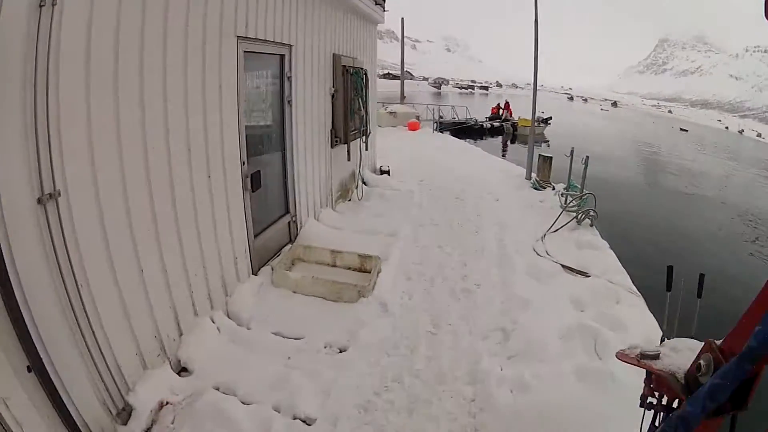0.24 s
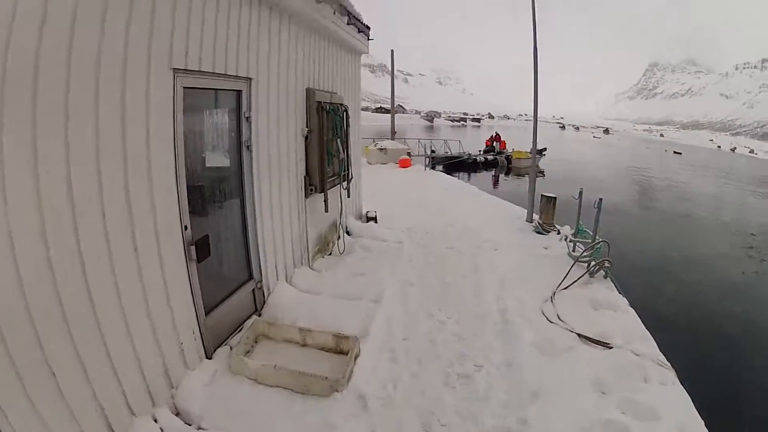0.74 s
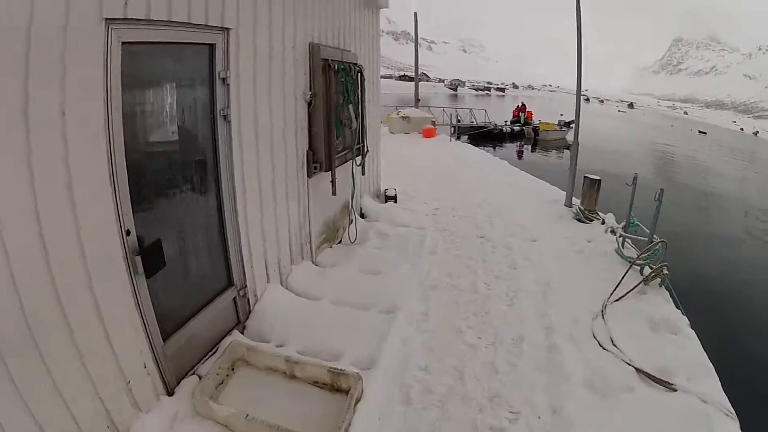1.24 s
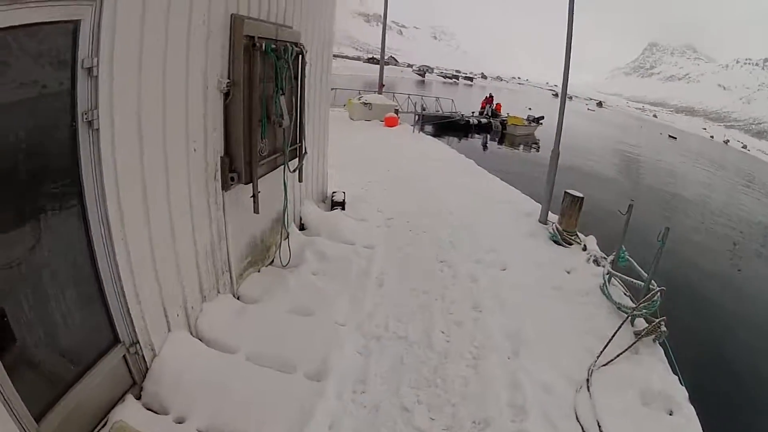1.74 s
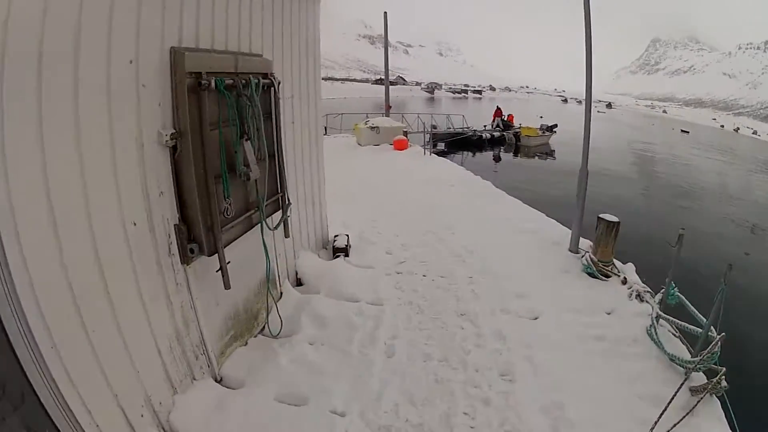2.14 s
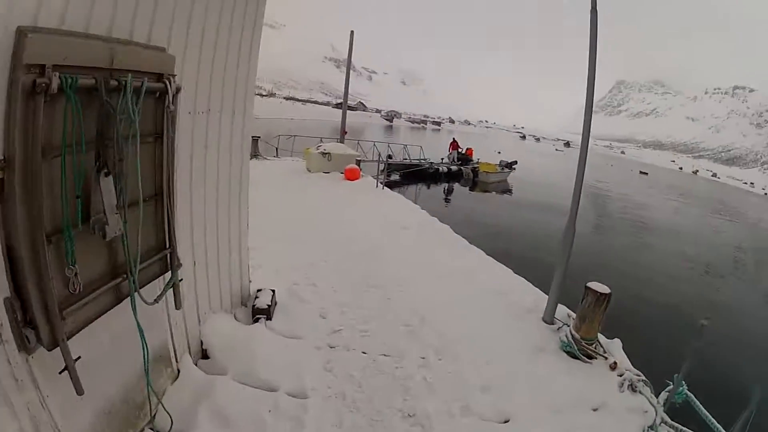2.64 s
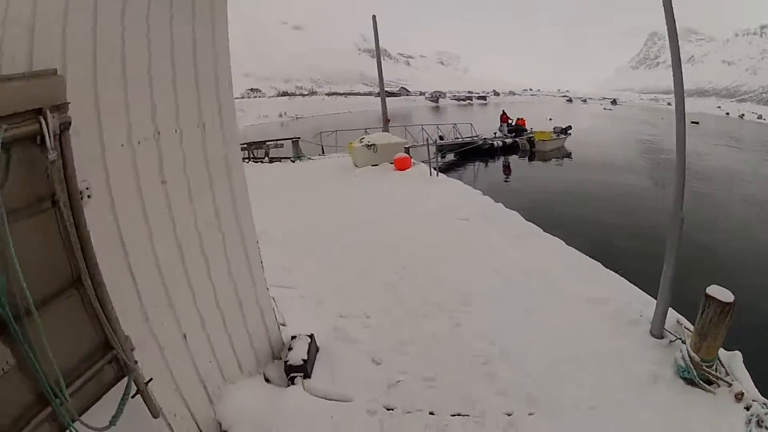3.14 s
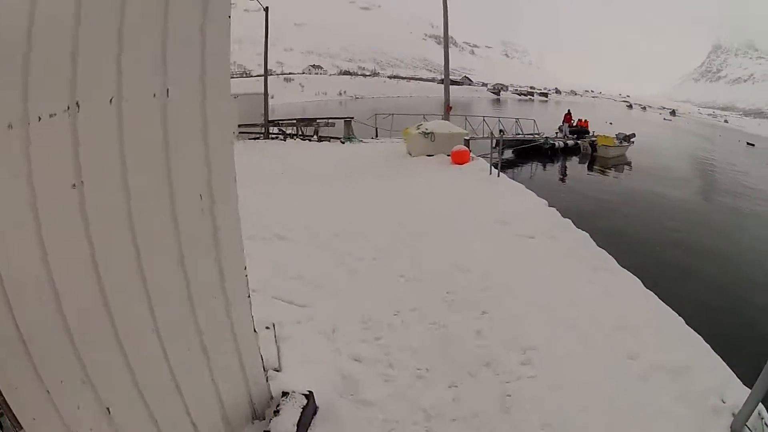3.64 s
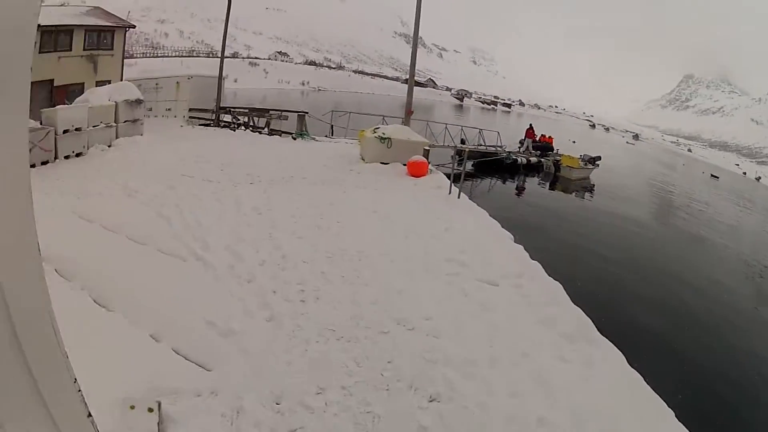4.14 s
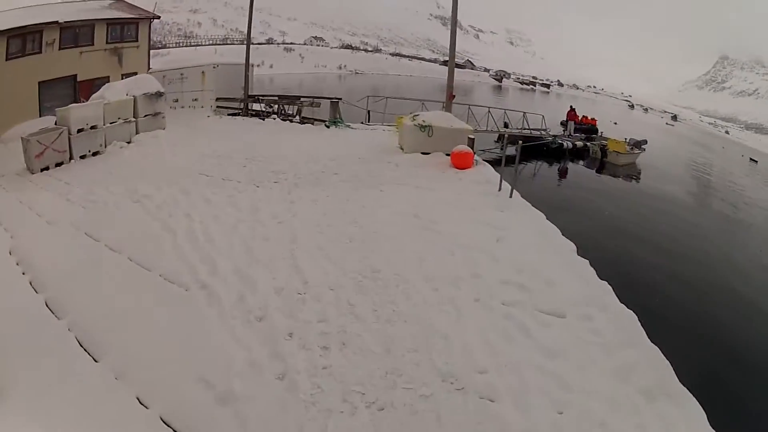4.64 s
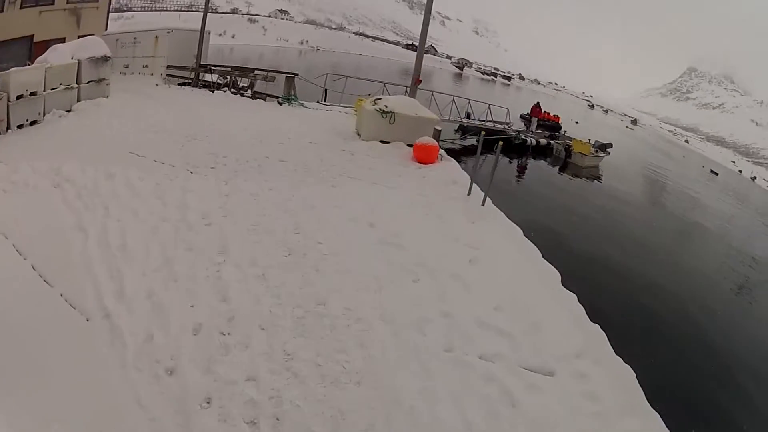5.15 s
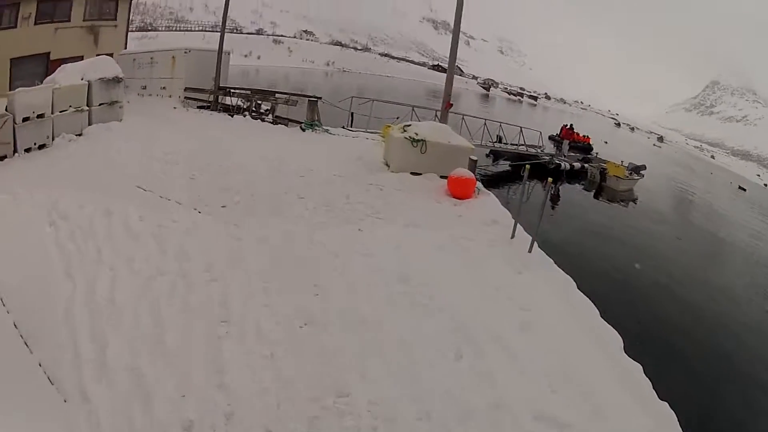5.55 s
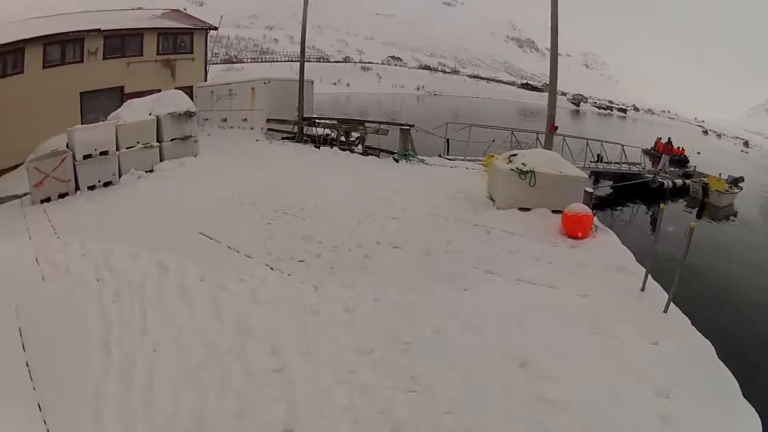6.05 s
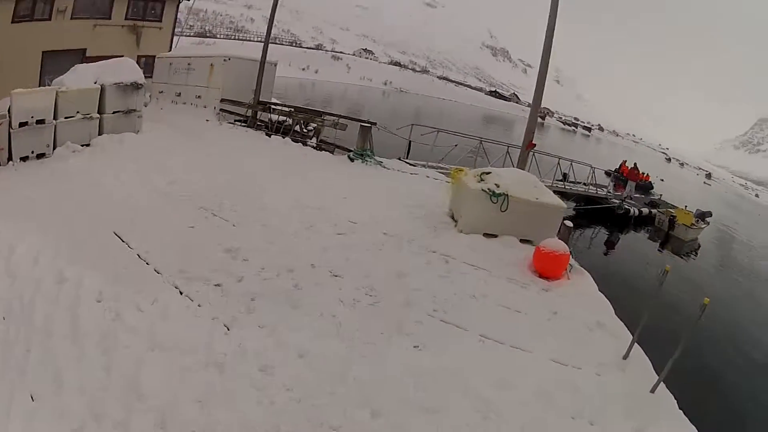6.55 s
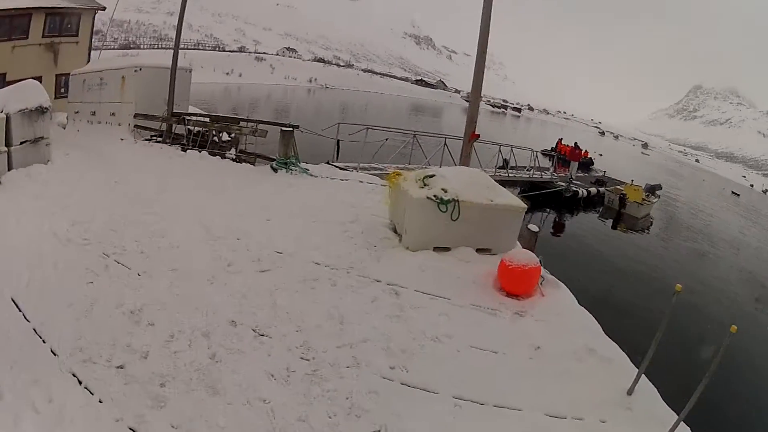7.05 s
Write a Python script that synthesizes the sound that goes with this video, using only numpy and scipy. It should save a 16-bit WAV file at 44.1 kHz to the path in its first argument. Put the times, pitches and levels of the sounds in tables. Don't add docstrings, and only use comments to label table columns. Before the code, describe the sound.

Heard from inside a small sealed plastic case worn on the body, a person walks across packed snow on a quay. Low cloth rumble and soft thumps swell with each stride, snow crunches in short boxy bursts, and straps and a catch knock and tick irregularly on the shell. The sharpest click comes just after three seconds. Faint harbour hum, hiss and thin electronic whine lie underneath.

```python
import sys
import numpy as np
from scipy import signal
from scipy.fft import rfft, irfft, next_fast_len
from scipy.io import wavfile
from scipy.ndimage import uniform_filter1d

SR = 44100
rng = np.random.default_rng(int(sys.argv[2]) if len(sys.argv) > 2 else 0)


def materialize(psi):
    bounded = np.clip(np.atleast_2d(psi).T, -1, 1)
    quanta = np.round(bounded * 32767).astype(np.int16)
    wavfile.write(sys.argv[1], SR, quanta)


def convert_level_to_amplitude(level_db):
    exponent = np.asarray(level_db, float) / 20
    return 10 ** exponent


N = 321048


def level(x, rms_db):
    return x * convert_level_to_amplitude(rms_db) / np.sqrt(np.mean(x ** 2))


def ring(x, hz, width_hz):
    return signal.lfilter(*signal.iirpeak(hz, hz / width_hz, fs=SR), x)


def band(x, low_hz, high_hz):
    return signal.sosfilt(signal.butter(3, [low_hz, high_hz], "bandpass", fs=SR, output="sos"), x)


def coloured_noise(spectrum):
    hz, db = np.transpose(spectrum)
    size = next_fast_len(N)
    log_hz = np.log(np.arange(1, size // 2 + 2) * SR / size)
    gain = convert_level_to_amplitude(np.interp(log_hz, np.log(hz), db))
    return irfft(rfft(rng.standard_normal(N), size) * gain, size)[:N]


def walk(rate_hz):
    hold = int(SR / rate_hz)
    draws = rng.standard_normal(N // 100 + 1)[:N // hold + 1]
    steps = np.repeat(draws, hold)
    return 1.3 * uniform_filter1d(uniform_filter1d(steps, hold), hold)[:N]


def swells(s, peak_db, rise_ms, fall_ms, rest_db):
    t = np.arange(0, N / SR, 1 / 500)
    since_ms = (t[:, None] - s) * 1e3
    drop_db = 10 * np.where(since_ms < 0, -since_ms / rise_ms, since_ms / fall_ms)
    power = (convert_level_to_amplitude(peak_db - drop_db) ** 2).sum(axis=1) + convert_level_to_amplitude(rest_db) ** 2
    return np.interp(np.arange(N) / SR, t, 10 * np.log10(power))


# (frequency [Hz], width [Hz], level [dB])
PANELS = [
    (722, 110, -13.5),
    (956, 88, -2.5),
    (1130, 144, -7),
    (2120, 65, 0.5),
    (2233, 83, -4),
    (3443, 380, 2.5),
    (4250, 550, 5.5),
    (5480, 720, 6),
]


def shell(x, flat_db, patchy_db):
    out = convert_level_to_amplitude(flat_db) * x
    for k, (hz, width_hz, db) in enumerate(PANELS):
        other_grains = np.roll(x, 9973 * k)
        out = out + convert_level_to_amplitude(db + patchy_db * walk(70)) * ring(other_grains, hz, width_hz)
    return out


def blows(table, low_hz, high_hz, wobble_rad, rise_ms, leak, trim_db):
    size = 2048
    out, t_ms = np.zeros(N + size), np.arange(size) / SR * 1e3
    for s, db, hz, ms, noisy in table:
        grit = rng.standard_normal(size)
        shape = (1 - np.exp(-t_ms / rise_ms)) * np.exp(-1.5 * t_ms / ms - (t_ms / ms) ** 4 / 4)
        phase = 2 * np.pi * hz * t_ms / 1e3 + wobble_rad * np.cumsum(grit[::-1])
        tone = shape * np.sin(phase)
        rattle = shape * grit * leak
        for panel_hz, width_hz, _ in PANELS:
            rattle = rattle + ring(shape * grit, panel_hz, 2 * width_hz)
        rattle = band(rattle, low_hz, high_hz)
        noisy = np.clip(noisy, 0, 1)
        blow = (1 - noisy) * tone / abs(tone).max() + noisy * rattle / abs(rattle).max()
        start = int(s * SR)
        out[start:start + size] += convert_level_to_amplitude(db + trim_db) * blow / abs(blow).max()
    return out[:N]


# (frequency [Hz], level [dB per Hz])
HARBOUR_SPECTRUM = [(29, -32), (50, -2.5), (91, -8.5), (306, -16), (566, -21), (810, -26), (949, -25.5),
                    (1410, -31), (1900, -29), (2100, -25), (2670, -35), (4140, -35), (5800, -43),
                    (7540, -74), (12800, -120)]


def harbour():
    return level(coloured_noise(HARBOUR_SPECTRUM), -63.5)


# (frequency [Hz], level [dB per Hz])
CIRCUIT_SPECTRUM = [(35, -40), (60, -12), (113, 4), (193, 4), (907, -17), (2230, -16.5), (4790, -15),
                    (5800, -12), (7540, -47), (12800, -120)]


def circuit_hiss():
    hiss = level(coloured_noise(CIRCUIT_SPECTRUM), -75.3)
    return hiss * np.array([[1], [-1]])


# (time [s], frequency [Hz])
LOAD_PITCH = [(.3, 4300), (1.0, 4230), (1.25, 4044), (1.7, 4000), (2.1, 4100), (2.5, 4240), (2.65, 4060),
              (2.9, 4220), (3.05, 4260), (3.25, 4025), (3.9, 4010), (4.3, 4130), (4.9, 4227), (5.4, 3977),
              (5.9, 4110), (6.5, 4203), (7.05, 4230), (7.25, 4010)]


def whine():
    whine_db, half_pitch_db, light_db, light_hz, sag_hz = -75.2, -1.5, -4.5, 4600, 259.2
    t = np.arange(N) / SR
    frames = (t + .0225) * 29.97
    which, part = frames.astype(int), frames % 1
    pitch, bend, size = rng.standard_normal((which[-1] + 1, 3))[which].T
    is_light = which % 3 == 2
    heavy_hz = np.interp(t, *np.transpose(LOAD_PITCH)) + 70 * pitch + 190 * bend * (part - .4)
    heavy_hz = heavy_hz + 90 - 250 * np.exp(-part / .06) - sag_hz * (part / .8) ** 2
    to_light = is_light * np.clip((part - .12) / .15, 0, 1)
    hz = heavy_hz + to_light * (light_hz + 50 * pitch - heavy_hz) + 90 * walk(200)
    gate = np.clip(5 * np.sin(np.pi * np.clip(part / .86, 0, 1)), .12, 1)
    gate = gate * convert_level_to_amplitude(2.5 * np.clip(size, -3, 1) + light_db * is_light)
    half_phase = np.pi * np.cumsum(hz) / SR
    full = level(gate * np.sin(2 * half_phase), whine_db)
    return full + level(gate * np.sin(half_phase), whine_db + half_pitch_db)


# (time [s], body level [dB], hollow level [dB], time per 10 dB [ms])
CLOTH_RUBS = [(.005, -57, -55, 47), (.24, -49, -50, 121), (.77, -56, -61, 140), (1.43, -55, -63.5, 220),
              (1.95, -54.5, -61.5, 100), (2.21, -63, -76, 110), (2.4, -51.5, -59.5, 98),
              (2.55, -58.5, -59, 72), (3.155, -47.5, -52.5, 48), (3.55, -75, -66, 60),
              (3.66, -56.5, -67, 100), (3.9, -60, -62, 105), (4.25, -54, -55.5, 73), (4.34, -64, -57, 60),
              (4.45, -61, -58.5, 80), (4.6, -67, -63.5, 150), (4.7, -59, -67, 90), (4.93, -59.5, -66, 170),
              (5.35, -61, -64, 79), (5.6, -61.5, -64, 200), (5.76, -57, -74, 112), (6.24, -65, -65, 100),
              (6.37, -60, -60.5, 70), (6.54, -59, -68, 90), (6.95, -67, -61.5, 300), (7.2, -64, -72, 40)]


def rumble():
    s, body_db, hollow_db, rise_ms = np.transpose(CLOTH_RUBS)
    fall_ms = 0.92 * rise_ms
    body_db = swells(s, body_db, rise_ms, fall_ms, rest_db=-63.5)
    hollow_db = swells(s, hollow_db, rise_ms, fall_ms, rest_db=-69)
    body = coloured_noise([(42, -22), (60, -5.5), (100, -2.5), (170, -9.0), (260, -27.5)])
    hollow = coloured_noise([(120, -19), (200, -2), (310, 1.5), (400, -8.0), (520, -16.5), (800, -29.0)])
    out = convert_level_to_amplitude(body_db + 1.75 * walk(25)) * level(body, -1.65)
    return out + convert_level_to_amplitude(hollow_db + 2.9 * walk(30)) * level(hollow, -1.66)


# (time [s], peak [dB], rise per 10 dB [ms], fall per 10 dB [ms])
CASE_LURCHES = [(0.035, -38.5, 25, 45), (0.104, -33, 55, 30), (0.174, -35.5, 34, 23), (0.245, -40, 46, 54),
                (0.405, -49.5, 21, 45), (0.784, -36.5, 41, 37), (1.096, -48.5, 27, 28),
                (1.155, -45, 20, 23), (1.255, -43.5, 51, 47), (1.393, -42.5, 23, 51), (1.5, -47, 50, 50),
                (1.636, -45.6, 84, 30), (1.888, -40.5, 89, 42), (2.033, -42.5, 26, 34),
                (2.147, -48, 28, 21), (2.231, -44, 23, 23), (2.341, -43, 51, 38), (2.436, -40, 23, 23),
                (2.478, -40.5, 20, 20), (2.588, -45.5, 31, 19), (2.686, -47, 21, 20), (2.81, -53, 26, 28),
                (2.917, -47, 19, 20), (3.139, -39.5, 45, 26), (3.193, -38, 41, 27), (3.484, -43.5, 26, 38),
                (3.572, -40, 27, 39), (3.672, -33.5, 38, 43), (3.939, -44.8, 33, 23), (4.27, -38, 21, 52),
                (4.382, -42.8, 22, 30), (4.44, -43.1, 34, 20), (4.707, -42.5, 45, 42), (4.923, -39, 57, 33),
                (4.981, -35.5, 32, 25), (5.096, -41, 29, 64), (5.585, -43.6, 30, 34),
                (5.683, -38.5, 33, 31.5), (5.777, -40, 20, 17), (5.877, -43.5, 39, 20),
                (6.186, -44.5, 27, 32), (6.266, -35.5, 26, 30), (6.358, -38, 22, 47), (6.507, -45, 22, 20),
                (6.571, -42, 19, 29), (6.866, -46.9, 74, 24), (6.942, -39, 17.5, 21),
                (7.002, -41.6, 18, 18), (7.06, -50.1, 20, 20), (7.21, -50.1, 18, 48)]


def sway():
    push = np.pad(rng.standard_normal(N), (SR // 2, 0), "wrap")
    rock = ring(ring(band(push, 20., 44.), 35.5, 24.), 35., 34.)[-N:]
    swell = abs(signal.hilbert(rock, next_fast_len(N))[:N])
    swell = uniform_filter1d(swell, SR // 40)
    even = level(rock / (swell + 0.2 * swell.mean()), -0.17)
    return convert_level_to_amplitude(swells(*np.transpose(CASE_LURCHES), rest_db=-58)) * even


# (time [s], peak [dB], swing [Hz], decay [ms])
HEEL_THUMPS = [(.215, -51, 310, 11), (0.223, -41.5, 63.5, 18), (1.862, -49, 85, 8.1), (2.208, -46, 76, 8),
               (2.406, -47, 76, 11), (3.157, -38.5, 298, 3), (3.556, -38, 164.3, 2.8),
               (3.883, -47, 80.5, 7.4), (4.338, -37.5, 132, 3), (4.892, -47, 75, 13), (6.94, -57, 75, 11),
               (.705, -54, 95, 14), (2.358, -51, 95, 12), (2.442, -47, 95, 12), (3.625, -51, 95, 12),
               (4.232, -52, 100, 12), (4.94, -51, 120, 12)]


def thumps():
    out, t = np.zeros(N), np.arange(N) / SR
    for s, db, hz, ms in HEEL_THUMPS:
        since = np.clip(t - s, 0, None)
        out += convert_level_to_amplitude(db + 5.0) * np.sin(2 * np.pi * hz * since) * np.exp(-since * 1e3 / ms)
    return out


# (time [s], peak [dB], length [ms])
LID_CATCH = [(0.3013, -37.5, 3.9), (.7815, -40, 3), (0.8134, -31, 2.7), (.8254, -41, 7.4),
             (.835, -42.5, 6.8), (1.513, -33, 3.5), (1.9732, -42.5, 4.9), (2.432, -34.5, 4.5),
             (2.439, -41.5, 3.9), (3.148, -31, 2.9), (3.1538, -38, 3.8), (3.1868, -41, 6.1),
             (3.8575, -40, 4.3), (4.375, -41.5, 3.5), (4.9296, -45, 5.8), (5.9652, -45, 2.6),
             (6.057, -46, 2.7), (6.2482, -38, 5.3), (6.975, -33.5, 2.2), (6.9818, -43.5, 3.5)]
# (time [s], peak [dB], ring [Hz], length [ms])
BUCKLE_TICKS = [(0.132, -45, 3450, 2.4), (.652, -44.5, 3730, 3), (.657, -41, 3580, 3.7),
                (0.7755, -40, 3660, 2.7), (0.8205, -45, 3400, 3.1), (1.6018, -45, 3490, 2.4),
                (2.3758, -38, 3190, 7.9), (3.1183, -48, 3560, 4), (3.1612, -23.5, 3370, 2.2),
                (3.1703, -27.5, 3500, 1.5), (3.8182, -47, 3320, 3.5), (3.828, -43.5, 3320, 4.6),
                (3.9024, -43, 3100, 3.9), (3.91, -47, 3170, 3.7), (4.2215, -42, 3615, 8.9),
                (4.4328, -46, 3300, 3), (4.5095, -47, 3470, 3.5), (4.6067, -33.5, 3600, 2.6),
                (4.6255, -48, 3410, 2.7), (4.9674, -52, 3470, 2.3), (5.5166, -45, 3560, 3.96),
                (6.0265, -47, 3400, 1.9), (6.4972, -45, 3360, 2.5), (6.6017, -52, 2990, 2.6),
                (6.892, -39.5, 3530, 4.4)]
# (time [s], peak [dB])
HINGE_PIN = [
    (.0116, -49.5),
    (0.8444, -46),
    (1.285, -49),
    (2.365, -43),
    (3.191, -51),
    (3.863, -49),
    (4.384, -49),
    (4.9345, -50),
    (5.4705, -54),
]


def ticks():
    catch = [(s, db, 5356, ms, 0.37) for s, db, ms in LID_CATCH]
    buckle = [(s, db, hz, ms, 1.49 / ms) for s, db, hz, ms in BUCKLE_TICKS]
    pin = [(s, db, 4050, 4.4, 0.7) for s, db in HINGE_PIN]
    return blows(sorted(catch + buckle + pin), low_hz=1270.0, high_hz=8000.0,
                 wobble_rad=0.15, rise_ms=0.13, leak=0.59, trim_db=0.4)


# (time [s], peak [dB], ring [Hz],
# length [ms])
BROAD_KNOCKS = [(.656, -41.5, 1235, 11), (1.894, -46.5, 1100, 4), (2.3665, -35, 2220, 4.2),
                (2.367, -32.5, 1226, 4.4), (2.544, -53, 987, 4.9), (3.1563, -32, 956, 7.5),
                (3.625, -49, 953, 3.7), (4.22, -42, 1170, 6.6), (4.274, -45.5, 1130, 6.5),
                (4.557, -54, 960, 8.7), (4.572, -52, 990, 6.3), (4.833, -50, 907, 3.4),
                (4.842, -45, 940, 5.3), (5.473, -51, 1030, 8.1), (6.354, -51.5, 1000, 5.6),
                (6.663, -52, 1174, 5), (6.893, -39.5, 1200, 8.7)]
# (time [s], peak [dB], ring [Hz], length [ms])
SIDE_KNOCKS = [(.667, -45, 2130, 4.2), (.813, -44, 2020, 11), (1.513, -49.5, 2145, 4),
               (1.602, -50, 1840, 2.4), (1.727, -50, 2140, 7.3), (1.737, -57, 1860, 3.6),
               (1.867, -46.5, 2240, 5.8), (2.098, -47.5, 2280, 5.4), (2.993, -50.5, 2120, 5.5),
               (3.17, -38, 2580, 3.2), (3.727, -47, 1810, 6.1), (3.828, -45, 1920, 4.1),
               (3.902, -44.5, 1670, 3.2), (3.91, -52, 2090, 4.5), (4.176, -51.5, 1790, 4),
               (4.264, -56, 2100, 4.1), (4.4323, -30.5, 1780, 3), (4.509, -49, 1640, 4),
               (4.607, -39, 1950, 4.2), (4.624, -44, 1610, 4.4), (4.6255, -35.5, 1760, 3.8),
               (4.952, -46.5, 1860, 5.1), (5.515, -52, 2020, 2.8), (6.026, -38.5, 1840, 4.2),
               (6.976, -51, 2110, 5.1)]


def knocks():
    broad = [(s, db, hz, ms, 0.44 - 0.02 * (db + 45)) for s, db, hz, ms in BROAD_KNOCKS]
    side = [(s, db, hz, ms, 0.41) for s, db, hz, ms in SIDE_KNOCKS]
    return blows(sorted(broad + side), low_hz=1000.0, high_hz=3130.0,
                 wobble_rad=0.05, rise_ms=0.66, leak=0.84, trim_db=0.11)


# (time [s], peak [dB], ring [Hz], length [ms])
CRUST_SLABS = [(.146, -53, 1000, 9), (.17, -52, 1090, 9), (.185, -54, 900, 7), (.225, -58, 3500, 20),
               (.265, -58, 3100, 22), (.352, -54, 2110, 18), (.453, -57, 1600, 14), (.475, -57, 1700, 12),
               (.654, -47, 2110, 7), (.672, -54, 2110, 8), (2.413, -56, 800, 7), (2.418, -56, 2200, 6),
               (2.439, -53, 920, 7), (3.0, -54, 2130, 10), (3.093, -51, 2150, 7), (3.147, -49, 4000, 3),
               (3.1585, -38, 2030, 3), (3.161, -40, 1270, 4), (4.2245, -45, 2900, 5),
               (4.2235, -49, 4200, 5), (4.274, -53, 2800, 9), (4.287, -52, 3200, 8), (4.4325, -43, 1120, 4),
               (4.452, -50, 325, 32), (4.607, -47, 2800, 4), (4.626, -52, 3320, 4), (4.841, -52, 1300, 6),
               (5.559, -55, 1580, 16), (5.565, -53, 800, 8), (5.59, -54, 620, 8), (6.891, -51, 2750, 5)]


def slabs():
    return blows([(*row, .15) for row in CRUST_SLABS], low_hz=700.0, high_hz=5000.0,
                 wobble_rad=0.08, rise_ms=1.2, leak=.4, trim_db=0.1)


# (time [s], peak [dB],
# ring [Hz], length [ms])
CRUST_LUMPS = [(.186, -51, 2150, 9), (.197, -52, 2150, 9), (.244, -52, 2100, 6), (.308, -50, 2100, 11),
               (.698, -51, 1004, 9), (.709, -51, 2130, 12), (.712, -52, 1100, 9), (.722, -50, 1190, 9),
               (.724, -51, 2200, 6), (.745, -53, 1150, 8), (.775, -49, 1100, 3), (1.134, -51, 950, 5),
               (1.165, -51, 960, 10), (1.9, -48.5, 1010, 7), (1.9, -52, 3450, 6), (2.367, -40.5, 4600, 5),
               (2.367, -47, 3170, 4), (2.373, -46, 1300, 2.7), (2.377, -45, 1200, 6), (2.378, -45, 2130, 6),
               (2.417, -53, 1000, 10), (2.431, -52, 1250, 4), (3.089, -45, 1047, 3),
               (3.148, -42, 1400, 2.5), (3.1567, -32, 1750, 4), (3.163, -40, 2000, 3.5),
               (3.172, -43, 1990, 3), (4.2235, -37, 3620, 4.5), (4.234, -48, 2150, 5),
               (4.242, -52, 2150, 4), (4.265, -47, 2090, 8), (4.281, -52, 3170, 5), (4.4335, -45, 900, 4.5),
               (4.437, -50, 1700, 5), (4.628, -46, 1000, 7.2), (4.833, -52, 2140, 5), (4.842, -49, 2050, 8),
               (4.874, -54, 1050, 6), (4.889, -53, 1150, 5), (4.896, -53, 2250, 7), (4.9, -54, 1050, 6),
               (5.561, -50, 2100, 12), (5.568, -52, 3550, 6), (5.974, -49, 5300, 2.5),
               (5.987, -54.5, 3400, 2.5), (6.066, -55, 1850, 3), (6.197, -53, 3250, 3),
               (6.891, -46, 1000, 3), (6.939, -54.5, 3500, 5), (6.939, -52, 1010, 4)]


def lumps():
    return blows([(*row, 0.3) for row in CRUST_LUMPS], low_hz=740.0, high_hz=5400.0,
                 wobble_rad=0.11, rise_ms=0.51, leak=.5, trim_db=0.089)


# (time [s], level [dB], time per 10 dB [ms])
BOOT_TREADS = [(.22, -55.5, 292), (.75, -60, 130), (1.33, -62, 202), (1.85, -63.5, 173), (2.13, -61.5, 100),
               (2.5, -65.5, 252), (3.03, -66.5, 220), (3.77, -66, 150), (4.3, -62.5, 80),
               (5.58, -64.5, 120), (6.18, -65, 150), (6.48, -65, 150)]
# (time [s], peak [dB], length [ms], brightness [dB])
BOOT_SCUFFS = [(0.132, -49, 29, 11), (0.221, -52, 20, 9), (0.248, -49, 70, 12), (0.651, -37, 32, 0),
               (0.697, -41, 45, 3), (0.744, -39, 14, -4), (1.136, -38.5, 29, -8), (1.166, -40, 32, -4),
               (1.894, -39, 37, 3.5), (2.099, -48, 73, -9), (2.375, -38, 26, -13), (2.414, -38, 32, -8),
               (3.089, -32, 19, -4), (3.133, -38, 27, -5), (3.573, -43.5, 55, -15), (3.624, -48.5, 28, 2),
               (4.221, -34, 23, -5), (4.232, -48, 20, -7), (4.263, -40.5, 29, -3), (4.275, -37, 20, 6.5),
               (4.828, -38, 36, -4), (4.871, -44, 22, -9), (4.892, -41.5, 18, -10), (5.511, -37, 17, -4),
               (5.559, -32.5, 24, -14), (5.589, -39.5, 22, -8), (6.889, -45, 24, 4), (6.934, -40, 17, -6)]


def crunch():
    rest_db = -68
    s, db, slope_ms = np.transpose(BOOT_TREADS)
    tread_db = swells(s, db, slope_ms, slope_ms, rest_db)
    fizz_db = -71 + 0.49 * (tread_db - rest_db)

    chance = rng.random((3, N))
    struck = chance[0] < 2200 / SR
    grains = struck * np.sign(chance[1] - .5) * (1 - chance[2]) ** -.22
    heard = shell(grains * convert_level_to_amplitude(1.5 * walk(150)), flat_db=-16., patchy_db=3.0)

    low_power, high_power = convert_level_to_amplitude(tread_db - 2.45) ** 2, convert_level_to_amplitude(fizz_db - 3.0) ** 2
    t = np.arange(N) / SR
    for s, db, ms, bright_db in BOOT_SCUFFS:
        since_ms = np.clip(t - s, 0, None) * 1e3
        burst = (1 - np.exp(-since_ms / 0.93)) * np.exp(-since_ms / ms - (since_ms / ms) ** 4)
        low_power = low_power + (convert_level_to_amplitude(db - 16) * burst) ** 2
        high_power = high_power + (convert_level_to_amplitude(db - 18.0 + bright_db) * burst) ** 2
    low = np.sqrt(low_power) * level(band(heard, 600.0, 2227.0), 0)
    return low + np.sqrt(high_power) * level(band(heard, 3080.0, 6500.0), 0)


def scene():
    background = harbour() + whine()
    mount = rumble() + sway() + thumps()
    hits = ticks() + knocks()
    snow = slabs() + lumps() + crunch()
    return np.tile(background + mount + hits + snow, (2, 1))


def sample_and_hold(x):
    guarded = signal.sosfiltfilt(signal.butter(6, 5700., fs=SR, output="sos"), x)
    slow = signal.resample_poly(guarded, 40, 147, axis=1, window=("kaiser", 5.))
    held = np.repeat(slow, 4, axis=1)
    return signal.resample_poly(held, 147, 160, axis=1)


# (frequency [Hz], level [dB per bin])
TREBLE_FLOOR = [
    (10500, -125),
    (12300, -113),
    (13500, -104),
    (14000, -109),
    (14600, -103.5),
    (15200, -103),
    (15310, -86),
    (16400, -76),
]


def thin_treble(x):
    mid_side = np.array([x[0] + x[1], x[0] - x[1]]) / 2
    hz, _, cells = signal.stft(mid_side, SR, nperseg=1024)
    floor_hz, floor_db = np.transpose(TREBLE_FLOOR)
    floor = convert_level_to_amplitude(np.interp(hz, floor_hz, floor_db))[:, None]
    cells[0] *= uniform_filter1d(abs(cells[0]) ** 2, size=5, axis=0) > floor ** 2
    power = uniform_filter1d(abs(cells) ** 2, size=8, axis=1)[:, ::8]
    both, apart = power.repeat(repeats=8, axis=1)[:, :len(hz)]
    cells[1] *= (apart > both * convert_level_to_amplitude(-27) ** 2) & (apart > convert_level_to_amplitude(-119) ** 2)
    mid, side = signal.istft(cells, SR, nperseg=1024)[1][:, :N]
    low_pass = signal.butter(16, 15450., fs=SR, output="sos")
    return signal.sosfilt(low_pass, np.array([mid + side, mid - side]))


def top_cut(x):
    return signal.sosfilt(signal.butter(12, 16450, fs=SR, output="sos"), x)


def record(dry):
    mix = thin_treble(sample_and_hold(dry + circuit_hiss()))
    return top_cut(mix)


dry = scene()
out = record(dry)
materialize(out)
```